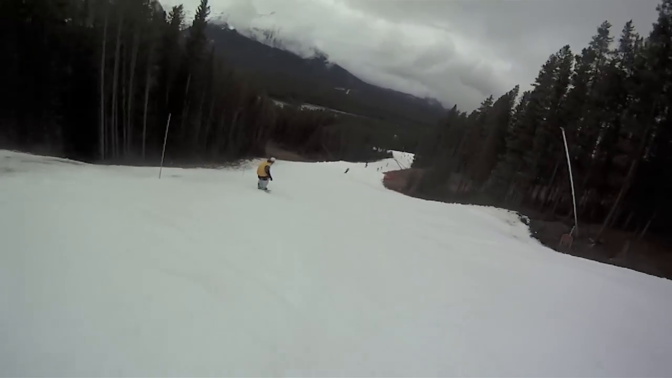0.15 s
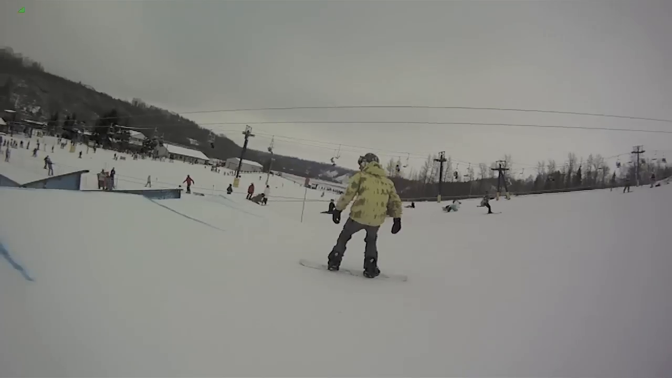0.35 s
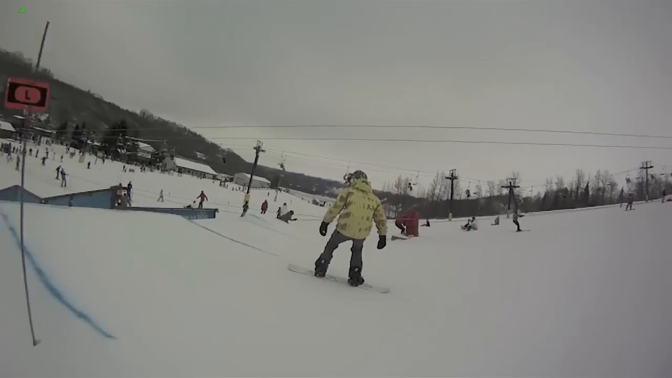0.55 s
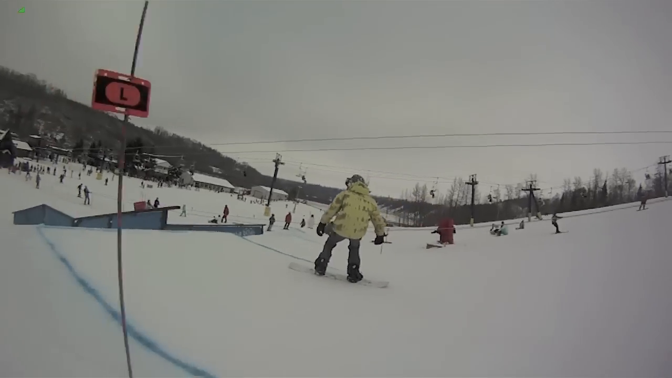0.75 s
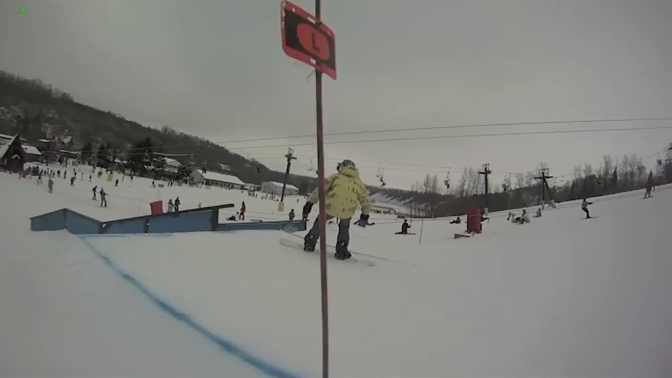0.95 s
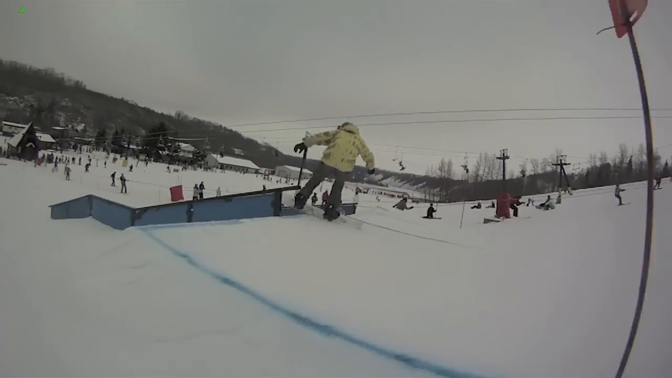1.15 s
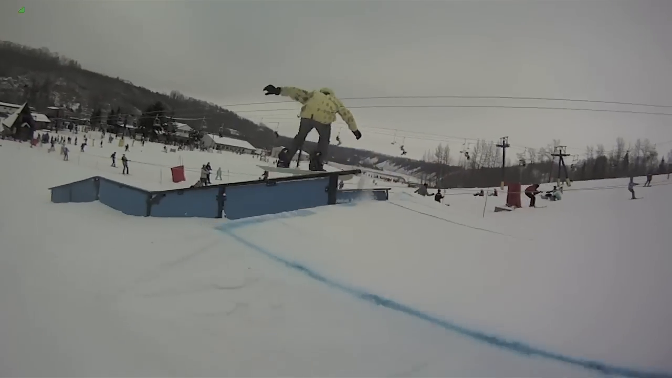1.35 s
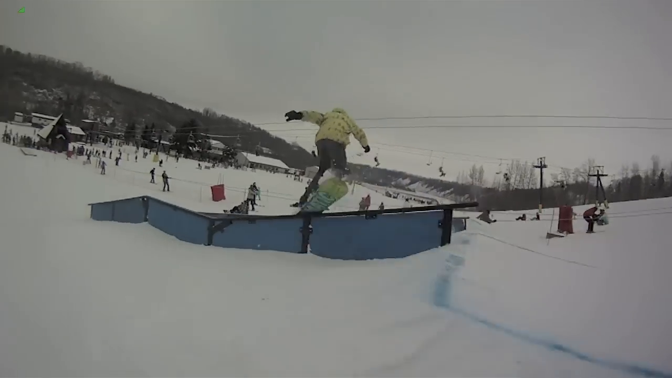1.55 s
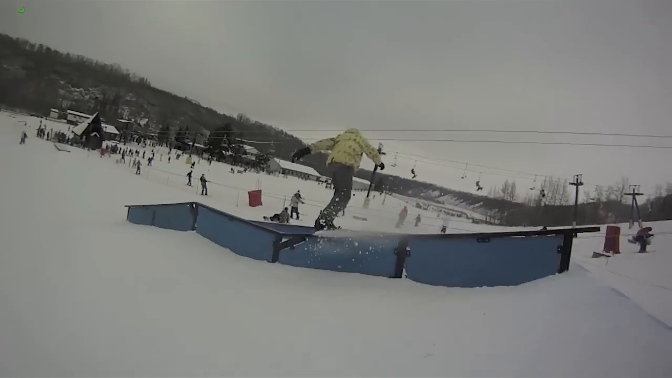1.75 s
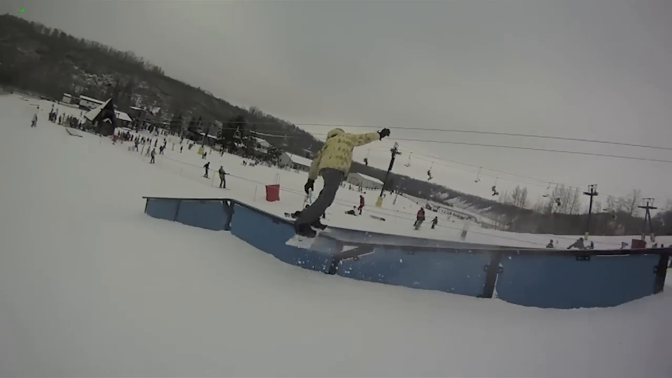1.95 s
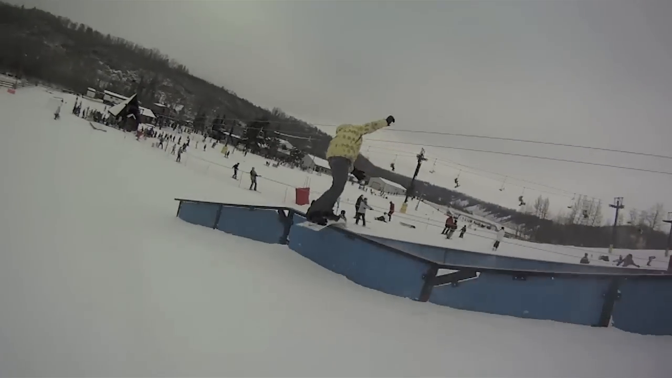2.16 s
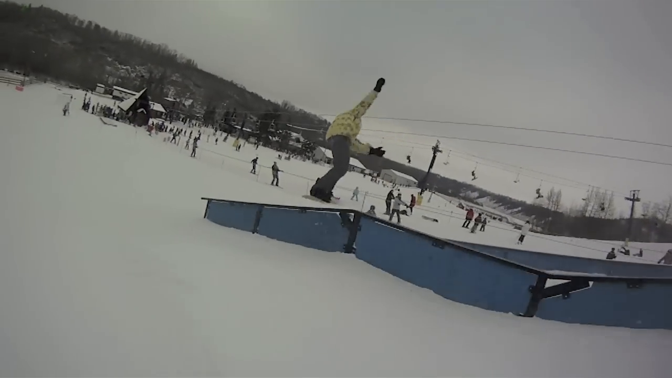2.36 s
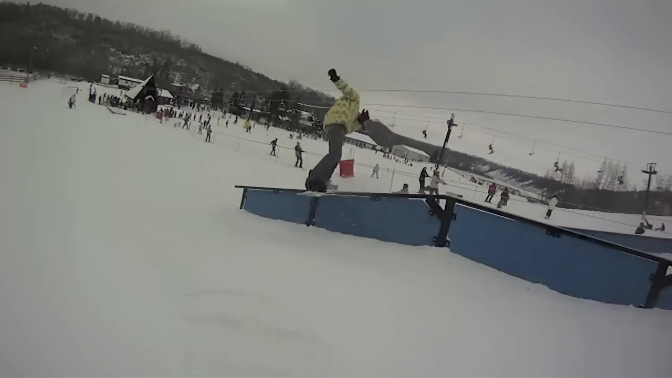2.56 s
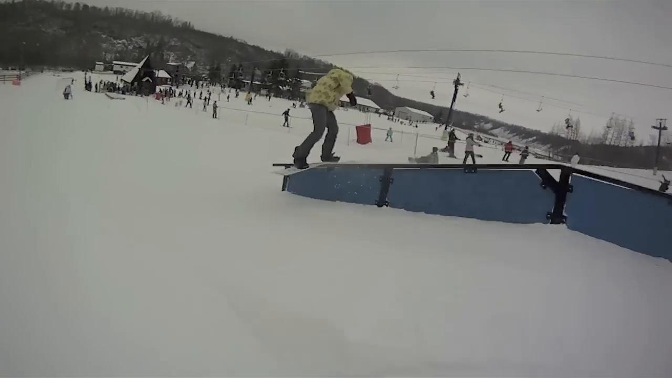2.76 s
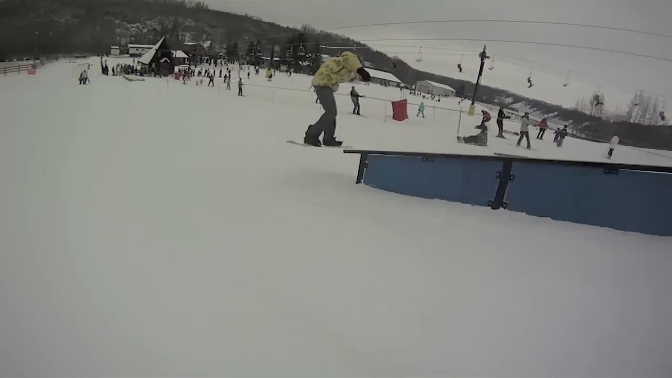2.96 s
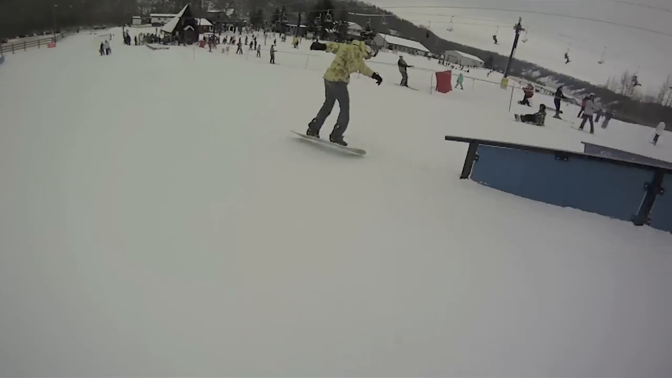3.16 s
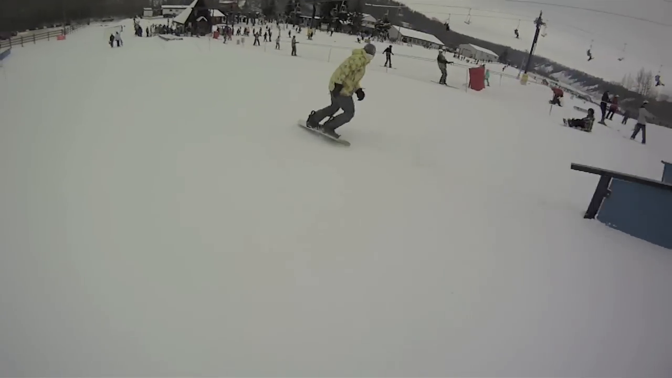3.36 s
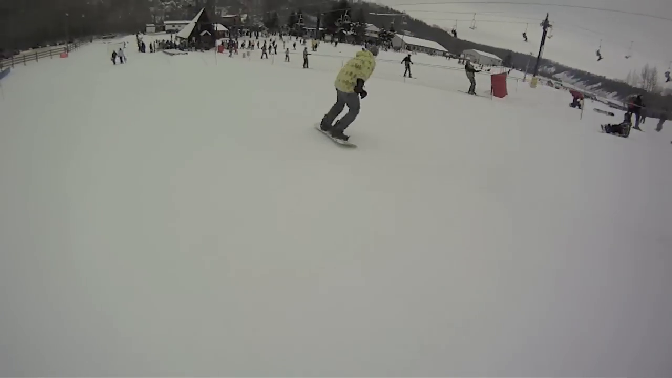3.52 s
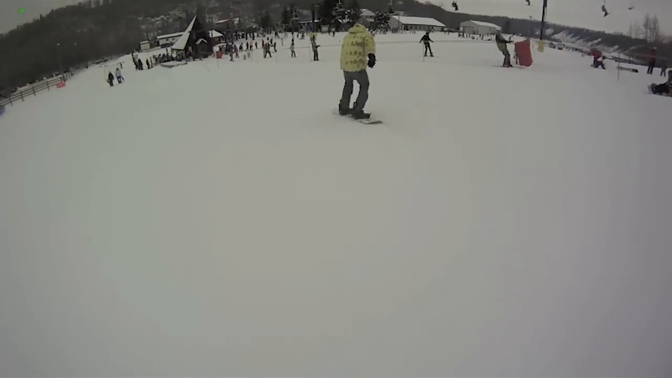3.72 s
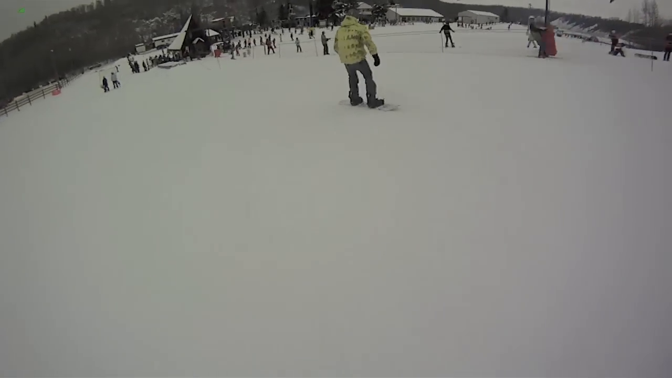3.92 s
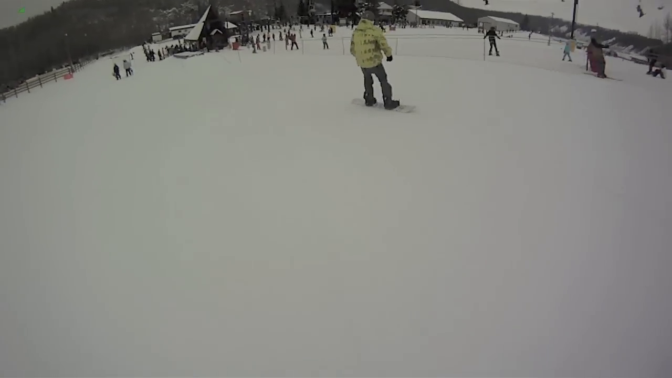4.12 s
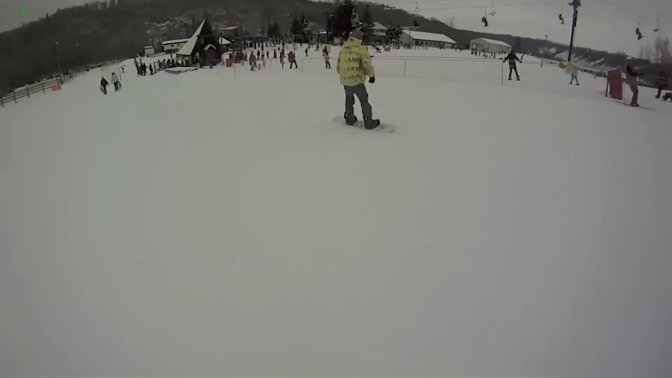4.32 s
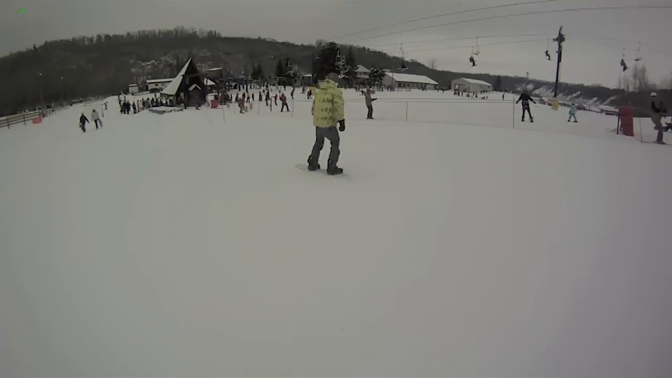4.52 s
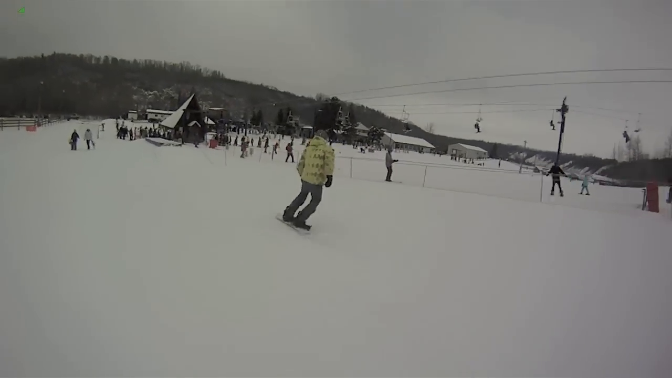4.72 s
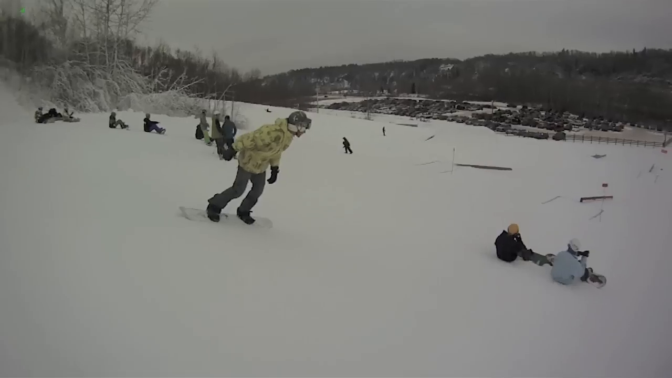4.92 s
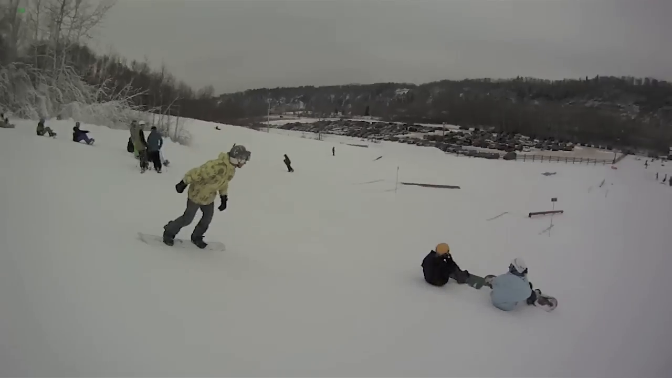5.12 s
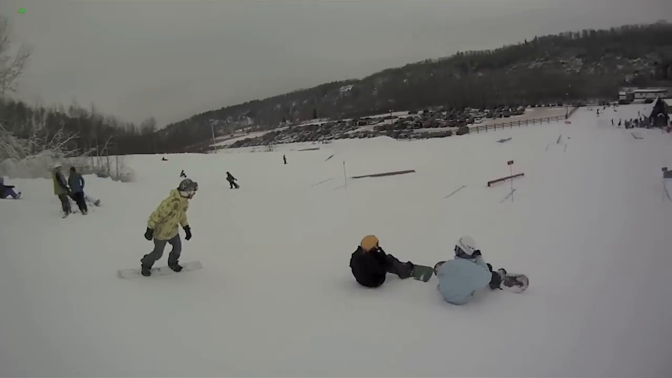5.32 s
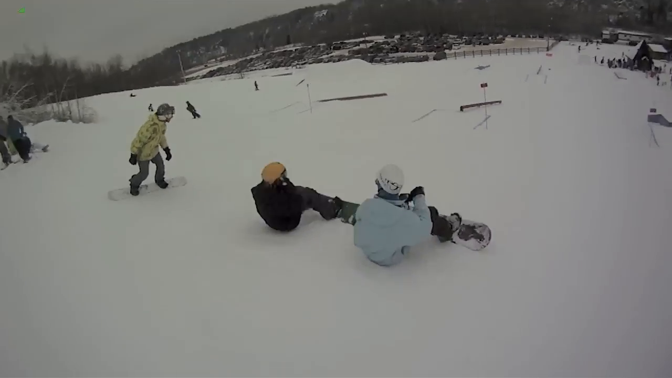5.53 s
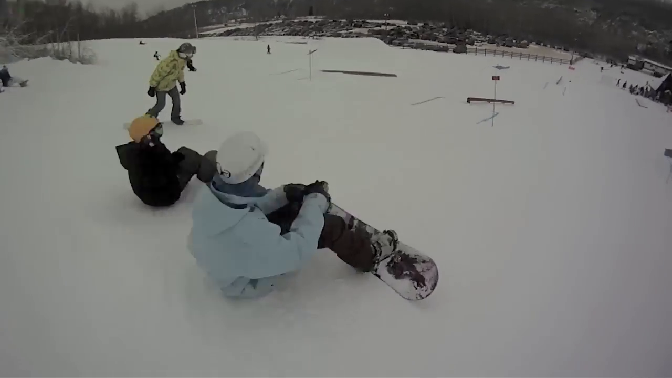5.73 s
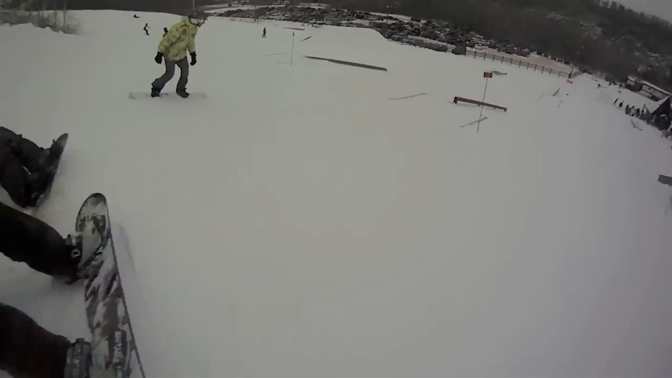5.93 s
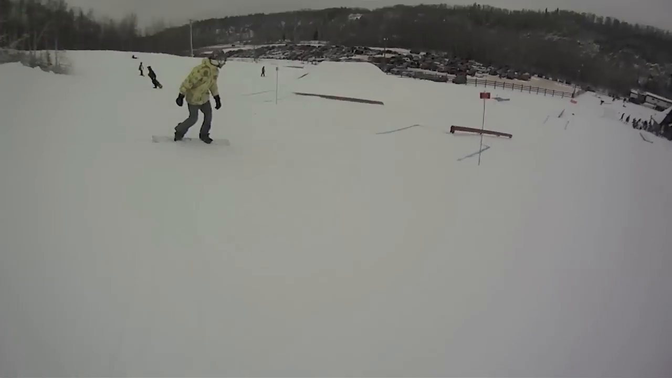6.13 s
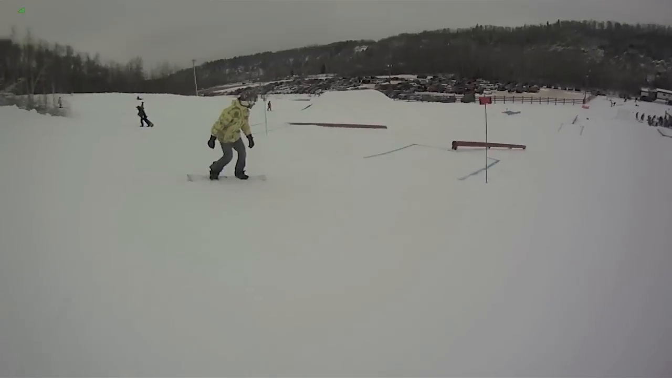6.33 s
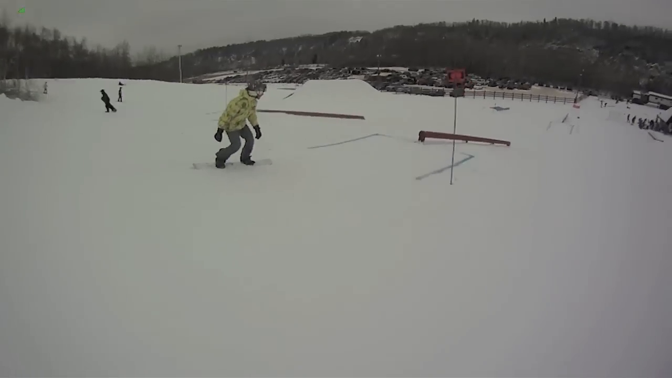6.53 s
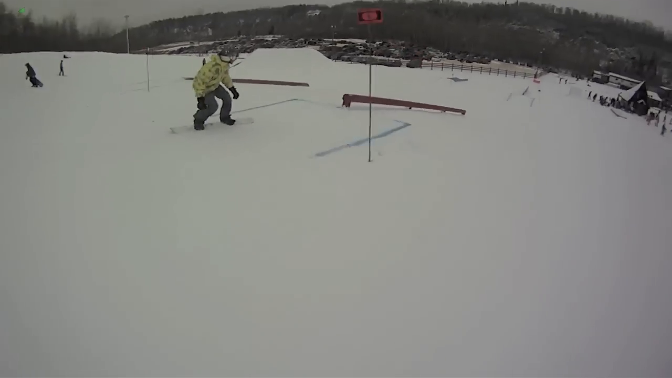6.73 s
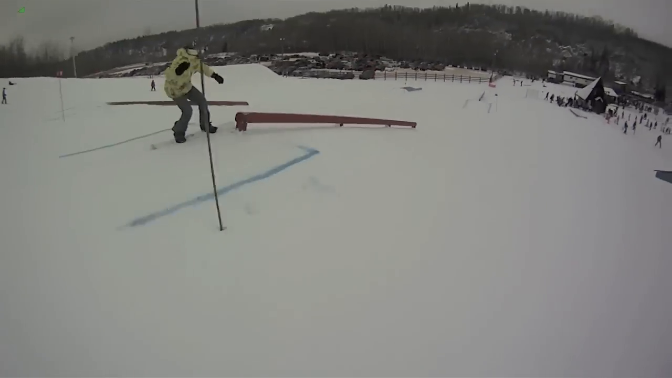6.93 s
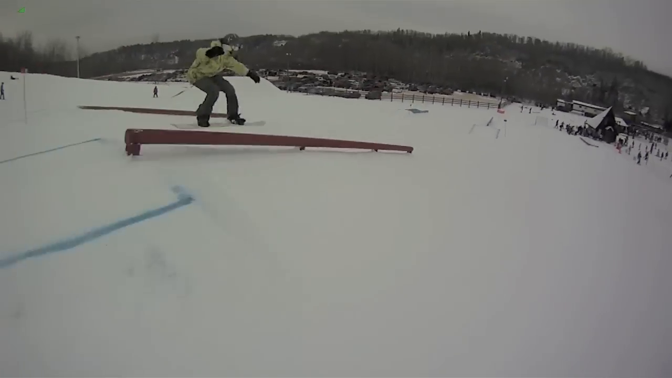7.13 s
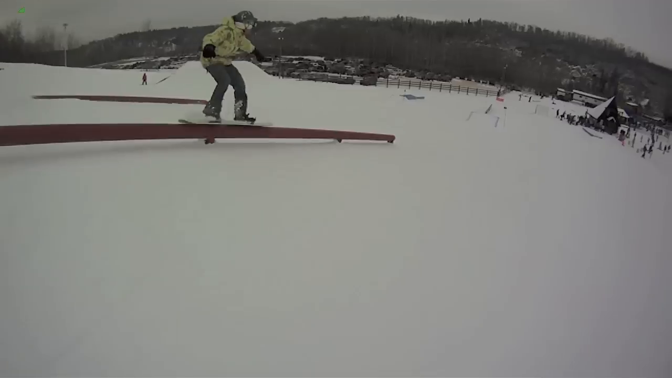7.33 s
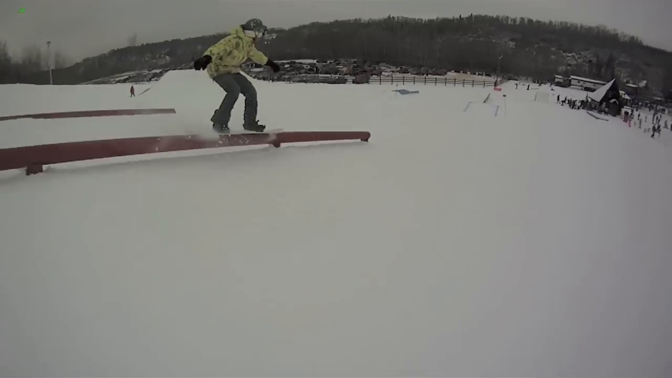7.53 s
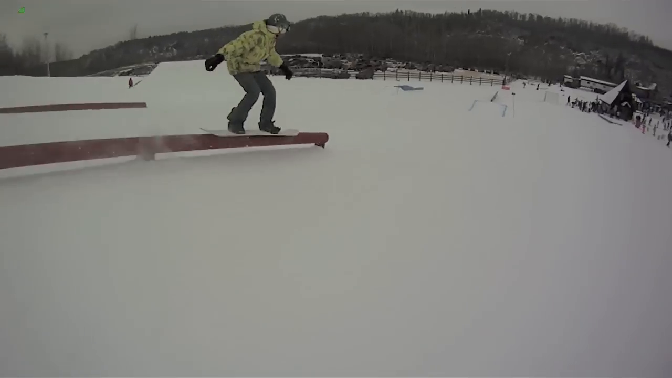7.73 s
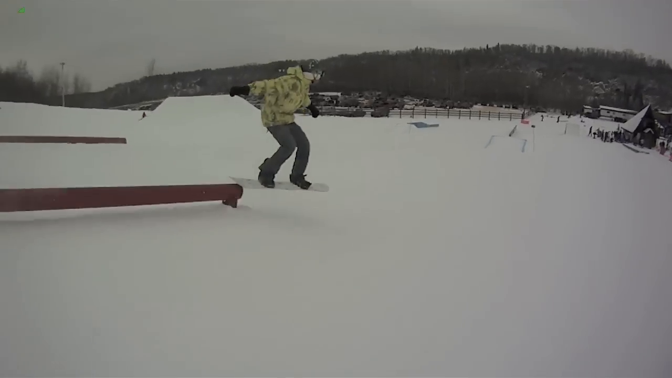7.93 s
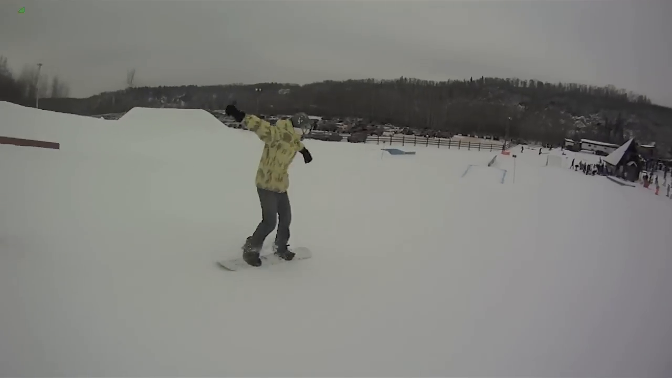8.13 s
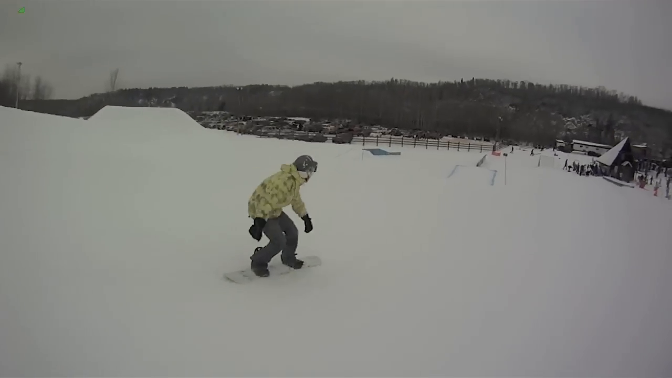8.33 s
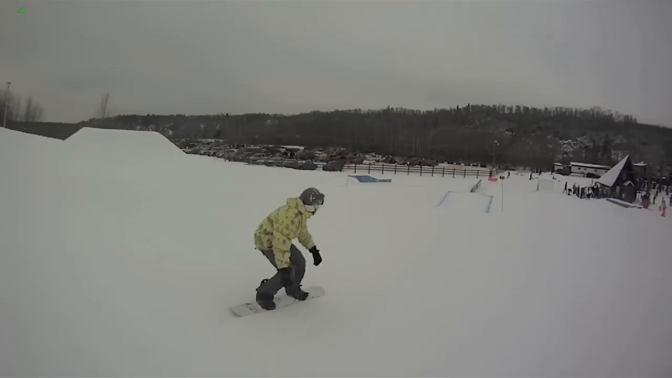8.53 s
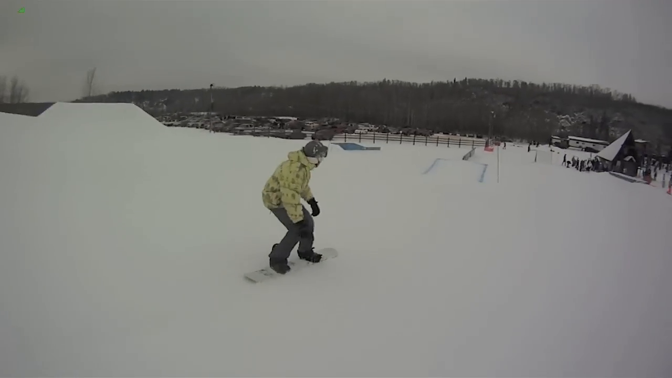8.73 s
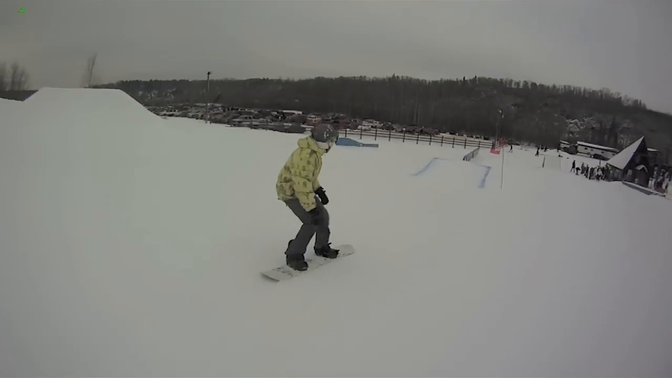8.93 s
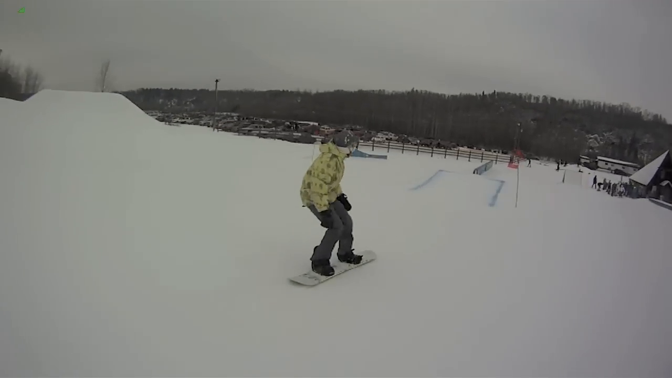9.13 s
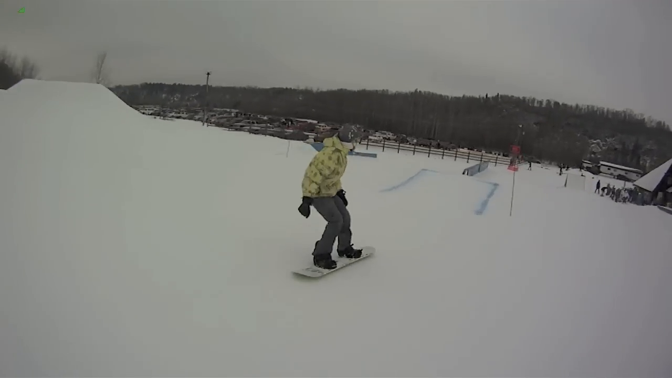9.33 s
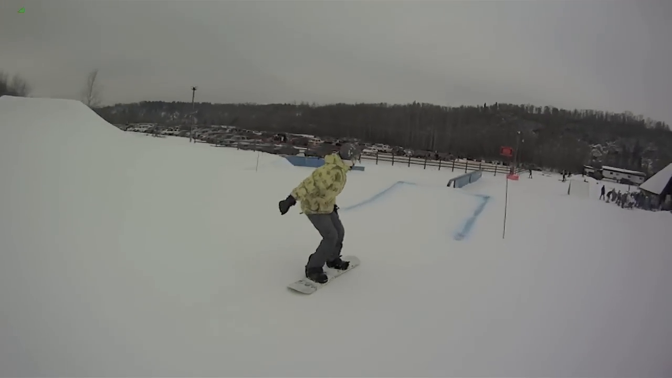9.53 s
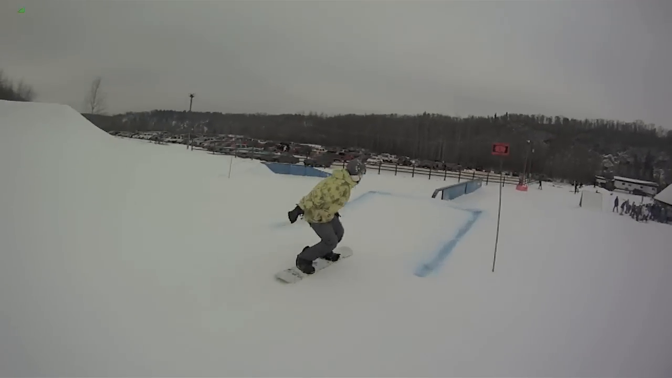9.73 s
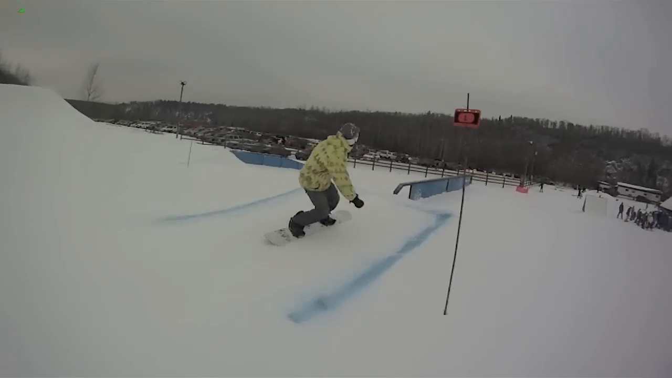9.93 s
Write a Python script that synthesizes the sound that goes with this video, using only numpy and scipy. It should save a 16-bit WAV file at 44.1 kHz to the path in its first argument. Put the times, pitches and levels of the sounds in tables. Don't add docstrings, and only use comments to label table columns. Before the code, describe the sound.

Muffled scraping of snowboards on firm snow, one sharp slap on a box, rattling camera case, then a louder fast glide and a clattering metal rail hit.

```python
import sys
import numpy as np
from scipy import signal
from scipy.fft import rfft, irfft
from scipy.io import wavfile
from scipy.ndimage import uniform_filter1d

SR = 44100
rng = np.random.default_rng(int(sys.argv[2]) if len(sys.argv) > 2 else 0)


def invert_db(x):
    u = np.asarray(x, float) / 20
    return 10 ** u


def unload_wav(signal):
    wavfile.write(
        sys.argv[1],
        SR,
        np.round(np.clip(np.atleast_2d(signal).T, -1, 1) * 32767).astype(np.int16),
    )


N = 439677
t = np.arange(N) / SR
bins_hz = np.fft.rfftfreq(N, 1 / SR)


def evened(x):
    return x / np.sqrt(np.mean(x ** 2) + 1e-20)


def peak_one(x):
    return x / np.max(abs(x))


def add(mix, s, sound):
    part = mix[round(s * SR):][:len(sound)]
    part += sound[:len(part)]


def curve(rows, axis):
    return np.interp(t, np.array(rows)[:, 0], np.array(rows)[:, axis])


def coloured(x, points):
    f, db = np.transpose(points)
    shape_db = np.interp(np.log(bins_hz + 1), np.log(f + 1), db, -90, -90)
    return evened(irfft(rfft(x) * invert_db(shape_db), N))


def ring(x, modes):
    out = np.zeros(len(x))
    for hz, width, db in modes:
        b, a = signal.iirpeak(hz, hz / (1.66 * width), SR)
        once = signal.lfilter(b, a, x)
        out += invert_db(db) * signal.lfilter(b, a, once)
    return out


def drift(per_s):
    return evened(signal.lfilter(*signal.butter(2, per_s, fs=SR), rng.standard_normal(N)))


def self_noise():
    return invert_db(-63) * rng.standard_normal(N)


# (time [s], level [dB])
WIND_LEVEL = [(0.0, -43), (0.2, -48), (0.47, -38), (0.9, -43), (1.4, -42), (2.25, -46), (2.8, -39.5),
              (3.4, -41), (4.7, -42), (4.85, -50), (5.05, -37), (5.4, -39), (5.8, -32.5), (6.2, -43.5),
              (6.8, -35.5), (8.3, -35), (9.4, -34), (9.97, -36.5)]
# (frequency [Hz], density [dB per Hz])
WIND_SPECTRUM = [(4.7, -8), (8.0, 0), (22, 0.5), (34, -1.5), (62, -15.5), (130, -40), (170, -58),
                 (290, -120)]
GUST_DB, GUSTS_PER_S = 2.5, 5.4


def wind():
    swings = coloured(rng.standard_normal(N), WIND_SPECTRUM)
    size = np.sqrt(abs(uniform_filter1d(swings ** 2, size=6000))) + 0.077
    gusts = invert_db(GUST_DB * drift(GUSTS_PER_S))
    return invert_db(curve(WIND_LEVEL, axis=1) + 2.0) * evened(swings / size ** 0.33 * gusts)


# (time [s], peak level [dB], lower resonance [dB])
CASE_RATTLES = [(0.083, -36, -12), (1.3604, -39.5, -3), (1.397, -34, -6), (1.8307, -45, -4),
                (4.1915, -38, -2), (4.7296, -40, -3), (4.7815, -40, -1), (4.79, -40, -2), (5.208, -40, -7),
                (5.3487, -36.5, -3), (5.4041, -40, -3), (5.474, -36, -3), (5.5094, -30.5, -2),
                (5.5142, -30, -3), (5.5932, -41, 0), (5.6261, -38.5, 3.5), (5.6334, -38, 3),
                (5.6814, -45, -4), (5.724, -36, -4), (6.0601, -41, -1), (6.0933, -35, 4), (6.1004, -35, 1),
                (6.2372, -40, -1), (6.2444, -37, 0), (6.356, -40, -4), (6.595, -40, -1), (6.741, -33, -4),
                (9.6294, -38, 6), (9.665, -33, 2), (9.7138, -36, -2)]
RATTLE_T60 = 0.017
BUZZ_FROM_S, BUZZ_TO_S, BUZZ_DB, BUZZ_SPREAD_DB = 5.2, 9.9, -47, 5


def rattles():
    out, u = np.zeros(N), t[:900]
    buzz = []
    for chance, size in rng.random(size=(30, 2)):
        s = BUZZ_FROM_S + (BUZZ_TO_S - BUZZ_FROM_S) * chance ** 2
        buzz.append((s, BUZZ_DB + BUZZ_SPREAD_DB * size, -2.5))
    for s, db, lower_db in CASE_RATTLES + buzz:
        impulse = 2.4 * (u == u[8])
        click = (rng.standard_normal(len(u)) + impulse) * invert_db(-60 * u / RATTLE_T60)
        bright = peak_one(ring(click, [(4250, 1200, 0)]))
        lower = peak_one(ring(click, [(2120, 350, 0)]))
        add(out, s, invert_db(db) * (bright + invert_db(lower_db) * lower))
    return out


# (time [s], frequency [Hz], level [dB], t60 [s])
RAIL_MODES = [(1.5362, 810, -29, .05), (1.5362, 1300, -46, .04), (1.5358, 1650, -11, 0.02),
              (1.557, 2740, -26, 0.029), (1.5358, 3700, -16, .022), (1.5362, 2840, -8, 0.016),
              (1.5362, 3800, -24, 0.017), (1.896, 2400, -30, 0.02), (1.896, 3050, -32, .02),
              (2.5025, 1900, -21.5, 0.025), (7.329, 2680, -24.5, 0.04), (5.0085, 1160, -32, .02),
              (5.0085, 2000, -29, 0.016), (5.029, 1200, -28, 0.016), (5.029, 1970, -28, 0.022),
              (7.32, 1530, -30, 0.12), (7.321, 420, -40, 0.078), (7.32, 830, -33, 0.05),
              (7.317, 1950, -27, 0.044)]
# (frequency [Hz], level [dB], t60 [s])
TUBE_MODES = [
    (735, -51, 1.1),
    (3950, -47, .7),
]
TUBE_S = 7.33


def rail():
    out, u = np.zeros(N), t[:20000]
    for s, hz, db, t60 in RAIL_MODES + [(TUBE_S, *mode) for mode in TUBE_MODES]:
        onset = np.minimum(u / 0.001, 1)
        add(out, s, invert_db(db - 60 * u / t60) * np.sin(2 * np.pi * hz * u) * onset)
    return out * invert_db(1.2 * drift(30))


# (time [s], peak level [dB], pitch [Hz], t60 [s], puff [dB])
LANDINGS = [(1.533, -40.5, 207, 0.16, 7), (1.575, -37, 130, 0.14, -12), (2.553, -37.5, 116, 0.11, -22),
            (3.198, -37.5, 110, 0.12, -13), (3.203, -32, 220, 0.055, -5), (4.628, -33, 111, 0.03, -8),
            (4.706, -34, 206, 0.033, -13), (4.974, -25.5, 112, 0.044, -14), (5.005, -33, 110, 0.049, -10),
            (5.029, -24, 112, 0.036, -8), (5.612, -35, 253, 0.03, -14), (6.653, -42, 132, 0.066, -5),
            (6.7, -36, 110, 0.043, -4), (7.319, -36, 139, 0.06, 0.5), (7.693, -43, 178, 0.05, -3),
            (8.149, -42, 109, 0.048, 2), (8.164, -37, 146, 0.053, -1), (8.175, -34, 172, 0.076, 1.5),
            (8.543, -46, 303, 0.06, 0), (8.95, -44, 110, 0.06, 7), (9.752, -42, 290, 0.067, -6)]
PUFF_HZ = 310


def thumps():
    out, u = np.zeros(N), t[:6000]
    for s, db, hz, t60, puff_db in LANDINGS:
        dying = invert_db(-60 * u / t60) * np.minimum(u / 0.0019, 1)
        push = np.sin(2 * np.pi * hz * u) * dying
        noise = rng.standard_normal(len(u))
        puff = peak_one(ring(noise * dying, [(PUFF_HZ, 0.9 * PUFF_HZ, 0)]))
        add(out, s, invert_db(db) * (push + invert_db(puff_db) * puff))
    return out


# (time [s], peak level [dB], hum part [dB], scrape part [dB])
SLAPS = [(0.1754, -38.5, 1, 4), (1.277, -41.5, 7.5, -5), (1.5308, -24, -28, -9), (1.5351, -8, -40, -2),
         (1.541, -28, -12, 6), (1.5467, -25.5, -10, 1), (1.556, -24.5, -13, -1), (1.582, -37, -10, 1),
         (1.5973, -37.5, -10, -1), (1.8908, -33, -9, 1), (1.8951, -29.5, -12, 0), (1.901, -38, -8, 0),
         (1.9265, -45, -9, 0), (2.5027, -31, -1, 0), (2.5391, -41, -13, 5), (2.652, -39.5, -6, 4.5),
         (2.8105, -42, -6, 4), (3.0704, -36, -6, 3), (3.08, -43, -8, 5), (3.2037, -40, -16, -9),
         (3.3004, -40, -14, -9), (4.6672, -42, -7, 10), (5.8282, -31, -1, -10), (6.7402, -34, -12, 6),
         (8.525, -41, 5, -7), (9.404, -34, 0, -10)]
# (time [s], peak level [dB], hum part [dB], scrape part [dB])
TUBE_CHATTER = [
    (7.2832, -29, -18, 5.5),
    (7.314, -27, -7, 5),
    (7.3176, -21.5, -4, -2),
    (7.3219, -20.5, -2, 4.5),
    (7.3288, -17.5, -21, -0.5),
    (7.339, -30, -12, -5),
    (7.3524, -28, -5, -9),
]
SLAP_TOP_DB, CHATTER_TOP_DB = -23, 2.5
SLAP_T60 = 0.022


def contacts(rows, top_db):
    out, u = np.zeros(N), t[:1800]
    for s, db, hum_db, scrape_db in rows:
        onset = np.minimum(u / 0.00095, 1)
        crack = rng.standard_normal(len(u)) * invert_db(-60 * u / SLAP_T60) * onset
        # (frequency [Hz], width [Hz], level [dB])
        parts = [(1280, 450, hum_db), (1890, 600, scrape_db), (3610, 620, 0.0), (4500, 2400, top_db)]
        for hz, width, part_db in parts:
            add(out, s, invert_db(db + part_db) * peak_one(ring(crack, [(hz, width, 0)])))
    return out


# (start [s], length [s], dig [dB], spray [dB], crunch [dB])
CARVE_EVENTS = [(-0.12, 0.52, -0.7, 6, -2), (0.143, 0.15, 4.5, -2, 6), (0.42, 0.16, 2.5, 0.5, 4),
                (3.183, 0.073, 0, 10.5, 0.5), (3.255, 0.12, 1, 8, 0.5), (3.5, 0.35, 1, -0.5, 2.5),
                (4.58, 0.33, 6, -7, 1.5), (5.026, 0.19, 15, -5, 11), (5.25, 0.096, 3.5, -0.5, 3),
                (5.7, 0.12, 3, 1, 8), (5.77, 0.21, 8, 1.5, 9.5), (7.357, 0.31, 0.5, 1.5, 1),
                (9.097, 0.43, 0, 2, 3.5)]
DIG_IN, LET_GO = 0.27, 0.31


def carving():
    extra_db = np.zeros((3, N))
    for s, length, *depths_db in CARVE_EVENTS:
        u = (t - s) / length
        swell = np.clip(np.minimum(u / DIG_IN, (1 - u) / LET_GO), 0, 1)
        extra_db += np.outer(depths_db, swell)
    return extra_db


# (time [s], speed as level [dB], edge bite [dB])
RIDE_CONTROL = [(0.0, -53.5, 5), (0.29, -55, 4), (0.45, -52.5, -1), (1.07, -52.5, 1.5), (1.72, -52, 0),
                (2.2, -53.5, -1.5), (2.7, -52, -0.5), (3.7, -52, -1), (4.0, -53, 0.5), (4.55, -51, -1),
                (5.3, -51, 3), (5.7, -45.5, -4), (6.1, -43, -6), (6.3, -45, -3.5), (6.8, -41.5, -4),
                (7.5, -41.5, -2), (8.7, -41, -2.5), (9.97, -43, 0)]
# (frequency [Hz], width [Hz], level [dB])
HUM_MODES = [(1249, 166, 13), (1400, 270, -4), (1050, 310, -10.5)]
# (frequency [Hz], width [Hz], level [dB])
SCRAPE_MODES = [(1914, 526, 18), (2164, 444, 9.5), (2520, 320, 1)]
# (frequency [Hz], width [Hz], level [dB])
SPRAY_MODES = [(3007, 170, 3.5), (3600, 325, 5), (4026, 390, -7)]
# (frequency [Hz], width [Hz], level [dB])
FIZZ_MODES = [(4371, 286, 0.5), (4846, 216, 8), (4960, 1100, -20.5)]
# (frequency [Hz], width [Hz], level [dB])
MIDDLE_MODES = [(1510, 250, 0)]
# (frequency [Hz], density [dB per Hz])
CRUNCH_SPECTRA = [
    [(47, -46), (80, 3), (103, -2), (237, -4), (320, -4.5), (475, -11), (950, -8), (1240, -103), (2090, -120)],
    [(47, -24), (80, -4.5), (150, -11.5), (235, -9.5), (280, -11), (741, -11), (950, -11), (1240, -27), (2090, -120)],
]
FIZZ_DB, MIDDLE_DB = -9, -8
HUM_DIG, CRUNCH_SPEED, SPRAY_BITE = 0.67, 0.18, 1.09
SPRAY_DB, CRUNCH_DB, CRUISE_DB = -3.5, -54.5, -50.5
GRAINS_PER_S, GRAIN_SPREAD_DB, GRAIN_SHARE, FLICKER_DB = 2500, 2.5, 0.43, 0.5


def crystals():
    sizes = invert_db(GRAIN_SPREAD_DB * np.minimum(rng.exponential(1, N), 5))
    breaks = rng.random(N) < GRAINS_PER_S / SR
    grains = evened(sizes * breaks * rng.choice([-1., 1.], N))
    friction = rng.standard_normal(N)
    return (GRAIN_SHARE * grains + (1 - GRAIN_SHARE) * friction) * invert_db(FLICKER_DB * drift(14.4))


def snow():
    drive = crystals()
    speed_db, bite_db = curve(RIDE_CONTROL, axis=1), curve(RIDE_CONTROL, axis=2)
    dig_db, thrown_db, crush_db = carving()
    hum_gain = invert_db(speed_db + HUM_DIG * dig_db)
    scrape_gain = invert_db(speed_db + bite_db + dig_db)
    spray_gain = invert_db(SPRAY_DB + speed_db + SPRAY_BITE * bite_db + dig_db + thrown_db)
    crunch_gain = invert_db(CRUNCH_DB + CRUNCH_SPEED * (speed_db - CRUISE_DB) + crush_db)
    hum = hum_gain * evened(ring(drive, HUM_MODES)) * invert_db(1.22 * drift(28))
    scrape = scrape_gain * evened(ring(drive, SCRAPE_MODES)) * invert_db(0.65 * drift(4.7))
    spray = spray_gain * evened(ring(drive, SPRAY_MODES)) * invert_db(1.02 * drift(8.1))
    slow, fast = [coloured(drive, spectrum) for spectrum in CRUNCH_SPECTRA]
    crunch = crunch_gain * np.where(t < 5.3, slow, fast) * invert_db(1.33 * drift(32))
    fizz_gain = invert_db(FIZZ_DB + 0.3 * thrown_db) * hum_gain ** 0.29 * spray_gain ** 0.69
    fizz = fizz_gain * evened(ring(drive, FIZZ_MODES))
    later = np.roll(drive, SR // 20)
    middle_gain = invert_db(MIDDLE_DB + 0.2 * dig_db) * np.sqrt(hum_gain * scrape_gain)
    middle = middle_gain * evened(ring(later, MIDDLE_MODES))
    return hum + scrape + middle + spray + fizz + crunch


def muffled(x):
    return signal.lfilter(*signal.butter(6, 5500, fs=SR), x)


def scene():
    slaps = contacts(SLAPS, SLAP_TOP_DB) + contacts(TUBE_CHATTER, CHATTER_TOP_DB)
    boards = snow() + slaps + thumps() + rail()
    return (muffled(boards) + wind() + rattles() + self_noise())[None]


SAMPLING_HZ, EDGE_HZ = 12000, 15330


def sample_and_hold(x):
    hold = np.sinc(bins_hz / SAMPLING_HZ)
    below = np.clip((SAMPLING_HZ / 2 - bins_hz) / 300 + 0.5, 0, 1)
    band = irfft(rfft(x) * below / hold.clip(0.1), N)
    images = band * (1 + 2 * np.cos(2 * np.pi * SAMPLING_HZ * t))
    edge = np.clip((EDGE_HZ - bins_hz) / 80, 0.003, 1)
    return irfft(rfft(images) * hold * edge, N)


# (time [s], fade out [s], fade in [s])
SCENE_CHANGES = [
    (.335, 0.087, 0.076),
    (4.939, 0.085, 0.065),
]


def dipped(x):
    for s, fade_out, fade_in in SCENE_CHANGES:
        x = x * np.interp(t, [s - fade_out, s, s + fade_in], [1, 0.02, 1])
    return x


def band_limit(x):
    return signal.sosfilt(signal.butter(12, 16200, fs=SR, output="sos"), x)


def record(dry):
    held = sample_and_hold(dry[0])
    return band_limit(dipped(held)[None])


dry = scene()
out = record(dry)
unload_wav(out)
```